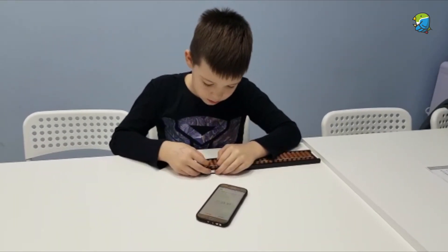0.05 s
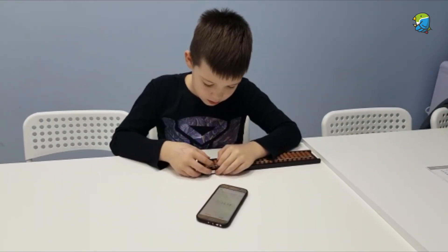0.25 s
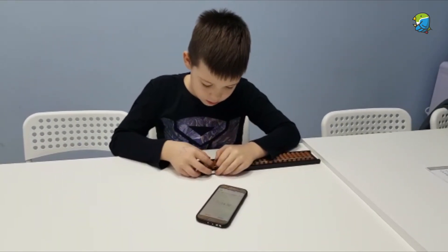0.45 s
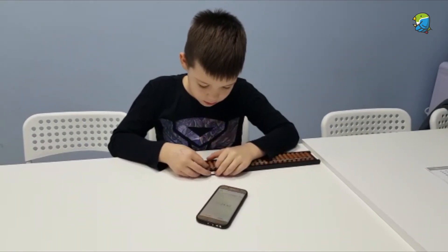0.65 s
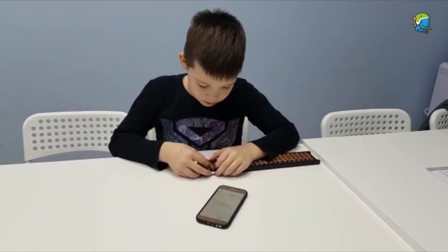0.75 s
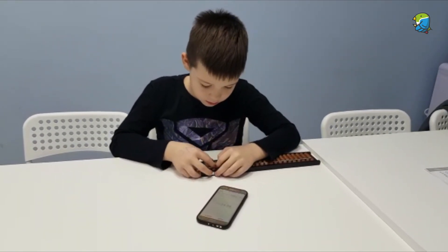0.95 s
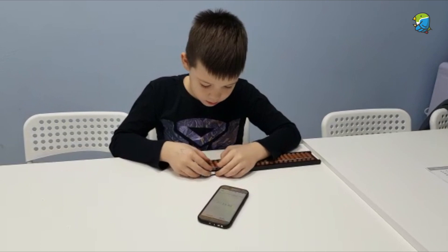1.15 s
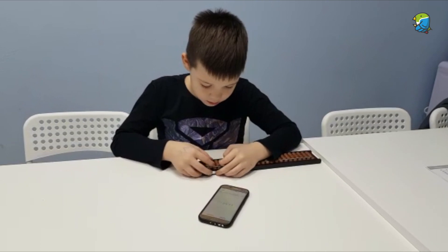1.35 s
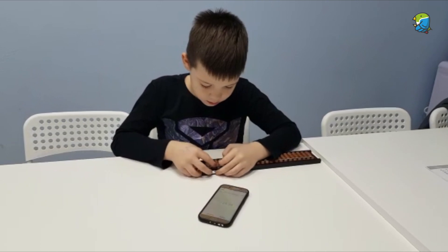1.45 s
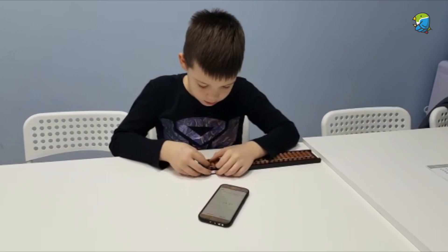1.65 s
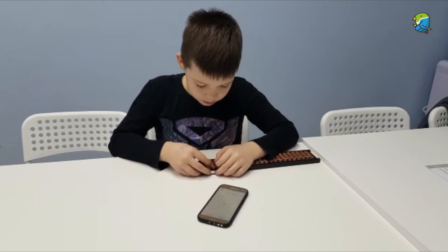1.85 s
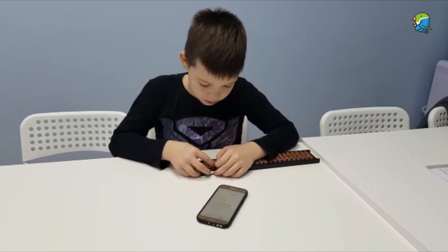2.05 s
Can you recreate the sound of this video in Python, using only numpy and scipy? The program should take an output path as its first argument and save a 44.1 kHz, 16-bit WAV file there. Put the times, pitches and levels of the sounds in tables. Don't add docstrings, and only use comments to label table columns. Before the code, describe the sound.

Small hard beads snap and tick against a frame, with faint slides between, over low ventilation rumble

```python
import sys
import numpy as np
from scipy import signal
from scipy.fft import rfft, irfft
from scipy.io import wavfile

SR = 44100
rng = np.random.default_rng(int(sys.argv[2]) if len(sys.argv) > 2 else 0)


def natural_amplitude(level_db):
    exponent = np.asarray(level_db, float) / 20
    return 10 ** exponent


def transcribe(u):
    v = np.clip(np.atleast_2d(u).T, -1, 1)
    q = np.round(v * 32767).astype(np.int16)
    wavfile.write(sys.argv[1], SR, q)


N = 92610
WAYS = 6
CONTACTS = 7


def across(points, hz):
    p = np.array(points, float)
    return np.interp(np.log(hz + 1), np.log(p[:, 0]), p[:, 1])


def level(x, db):
    return x * natural_amplitude(db) / np.sqrt(np.mean(x ** 2))


def tinted(points, rows):
    hz = np.arange(N // 2 + 1) * SR / N
    inside = (hz > points[0][0]) * (hz < points[-1][0])
    return rfft(rng.standard_normal((rows, N))) * natural_amplitude(across(points, hz)) * inside, hz


def hiss():
    # (frequency [Hz], density [dB per Hz])
    hiss_colour = [(280, -33), (480, -23), (547, 1), (624, -8), (672, -5), (861, -5.5), (8430, -12),
                   (15800, -7)]
    spectrum, _ = tinted(hiss_colour, 2)
    return level(irfft(spectrum, N), -64)


def ventilation():
    # (frequency [Hz], density [dB per Hz])
    rumble_colour = [(18, -7), (33, -8), (44, -17), (85, -9), (150, -14), (205, -11), (260, -20),
                     (480, -25)]
    # (frequency [Hz], left-right likeness [0-1])
    likeness = [(30, 0.31), (80, 0.96), (180, 0.49), (350, .5), (600, .1)]
    fan_hz, fan_width_hz, fan_db = 59.2, 14, 16
    swell_db, lean_db = 2.4, 0.4
    sides = np.array([[1], [-1]])
    noise, hz = tinted(rumble_colour, 2)
    mid, side = noise * (1 + natural_amplitude(fan_db) / (1 + (2 * (hz - fan_hz) / fan_width_hz) ** 2))
    alike = np.clip(across(likeness, hz), 0, 1)
    rumble = irfft(mid * np.sqrt(1 + alike) + side * np.sqrt(1 - alike) * sides, N)
    swell = np.interp(np.arange(N), np.linspace(0, N, num=12), rng.standard_normal(12))
    return level(rumble * natural_amplitude(swell_db * swell + lean_db / 2 * sides), -54)


def room(beads):
    # (band centre [Hz], t60 [s])
    bands = [(700, 0.34), (1400, 0.28), (2800, .32), (5600, 0.31), (11200, 0.25)]
    # (time [s], level [dB])
    echoes = [(.0125, -26), (.0205, -20)]
    gap_s, rise_s, hold_s, room_db = 0.0013, 0.0053, 0.026, 0
    t = np.arange(SR // 2) / SR
    hz = np.arange(len(t) // 2 + 1) * SR / len(t)
    noise = rfft(rng.standard_normal((WAYS, 2, len(t))))
    tail = 0
    for k, (_, t60_s) in enumerate(bands):
        share = across([(centre_hz, float(j == k)) for j, (centre_hz, _) in enumerate(bands)], hz)
        tail = tail + irfft(noise * share) * natural_amplitude(-60 * np.maximum(t - hold_s, 0) / t60_s)
    tail = tail * (1 - np.exp(-np.maximum(t - gap_s, 0) / rise_s))
    tail = tail * natural_amplitude(room_db) / np.sqrt(np.sum(tail ** 2) / 2)
    for k, (s, db) in enumerate(echoes):
        tail[k + 1, [0, 1], int(s * SR) + rng.integers(12, size=2)] += natural_amplitude(db)
    return signal.fftconvolve(beads[:, None], tail, axes=2).sum(axis=0)[:, :N]


def port(x, points):
    cepstrum = irfft(np.log(natural_amplitude(across(points, np.linspace(0, SR / 2, num=513)))))
    cepstrum[1:512] *= 2
    cepstrum[513:] = 0
    response = irfft(np.exp(rfft(cepstrum)))[:512]
    return signal.fftconvolve(x, response)[:N]


def microphones(beads, wet):
    # (frequency [Hz], gain [dB])
    near_left = [(500, -14.5), (2000, -2.5), (3800, -11), (5600, -4.5), (7200, -4.5), (8800, -5),
                 (12000, -3), (15500, -3)]
    # (frequency [Hz], gain [dB])
    near_right = [(500, -12), (2000, -3.5), (3700, -17), (5700, 6), (7000, -9), (8400, -40.5),
                  (12000, -0.5), (15500, -21.5)]
    # (frequency [Hz], gain [dB])
    round_left = [(500, -7.5), (2000, -3), (3800, -12.5), (5300, -10.5), (6300, -8), (8800, -5),
                  (12000, -8), (15500, -7)]
    # (frequency [Hz], gain [dB])
    round_right = [(500, -7.5), (2000, -5), (3800, -12.5), (5600, -6.5), (7000, -11), (8100, -16),
                   (10000, -7), (15500, -11)]
    # (frequency [Hz], gain [dB])
    aside = [(1000, -45), (4000, -13.5), (12000, 1.5)]
    left_leads_s = 5e-5
    late = np.roll(beads[0] + port(beads[1], aside), int(round(left_leads_s * SR)))
    left = port(beads[0], near_left) + port(wet[0], round_left)
    right = port(late, near_right) + port(wet[1], round_right)
    return np.array([left, right])


def ring(modes, db, onsets, sizes, t):
    rise_cycles, detune_share, mode_scatter_db = 0.21, 0.041 / 4, 4
    hz, mode_db, t60_s = np.array(modes).T[:, :, None, None]
    age = np.maximum(t - onsets[:, None], 0)
    rise = 1 - np.exp(-age * hz / rise_cycles)
    swing = np.sum(rise * np.exp(-np.log(1000) * age / t60_s) * sizes[:, None], axis=1)
    detune, scatter = rng.standard_normal((2, WAYS, len(modes), 1))
    cycles = hz[:, 0] * (1 + detune_share * detune * [[[4]]] * across_ways()) * t
    each = swing * np.sin(2 * np.pi * (cycles + rng.random(detune.shape)))
    each = each / np.sqrt(np.sum(each ** 2, axis=2, keepdims=True))
    y = np.sum(each * natural_amplitude(mode_db[:, 0] + mode_scatter_db * scatter), axis=1)
    return y * natural_amplitude(db) * np.sqrt(.004 * SR / np.sum(y ** 2, axis=1, keepdims=True))


def across_ways():
    return np.array([0.25] + [1] * (WAYS - 1))[:, None, None]


def abacus(rows, chatter_s, fade_db, count):
    # (frequency [Hz], level [dB], t60 [s])
    frame_modes = [(626, -5.5, 0.02), (815, -2, 0.031), (971.5, -3, 0.034), (1092, -4, 0.066),
                   (1230, -2.5, 0.009), (1554, -2.5, 0.039), (1950, -6.5, 0.035), (2277, -4, 0.0054)]
    # (frequency [Hz], level [dB], t60 [s])
    bead_modes = [(2865, 3.5, 0.0032), (3595, 0.5, 0.013), (3950, 5.5, 0.0023), (4600, -2, 0.018),
                  (5296, 1.5, 0.0027), (6250, -2.5, 0.017), (7170, 0.5, 0.002)]
    # (frequency [Hz], level [dB], t60 [s])
    tick_modes = [(8020, -3.5, 0.009), (9600, -4, 0.009), (10200, 0, 0.0013), (11400, -13, 0.0018),
                  (11520, 7.5, 0.0016), (13500, -0.5, 0.012), (12600, -3.5, 0.0077), (16000, -3.5, 0.0014)]
    knock_db, knock_cycles = 5.5, 19.7
    contact_scatter_db, low_cut_hz = 9.5, 493
    out, t = np.zeros((WAYS, N + SR)), np.arange(SR // 22) / SR
    for s, bead_db, frame_db, tick_db, knock_hz in rows:
        at = int(s * SR)
        slots = (np.arange(count) + rng.random(count)) / count
        onsets = s - at / SR + (slots - slots[0]) * chatter_s
        sizes = natural_amplitude(contact_scatter_db * rng.standard_normal(count) + fade_db * slots)
        frame, bead = frame_modes, bead_modes
        knock = [(knock_hz, knock_db, knock_cycles / knock_hz)]
        if knock_hz < bead_modes[0][0] * .9:
            frame = frame_modes + knock
        else:
            bead = bead_modes + knock
        for modes, db in ((bead, bead_db), (frame, frame_db), (tick_modes, tick_db)):
            out[:, at:at + len(t)] += ring(modes, db, onsets, sizes, t)
    return signal.sosfilt(signal.butter(4, low_cut_hz, "high", fs=SR, output="sos"), out[:, :N])


def slides():
    # (time [s], bead level [dB], frame level [dB], tick level [dB], knock pitch [Hz])
    slide_events = [
        (.405, -51, -47, -58, 1650),
        (.420, -46, -45, -68, 2085),
        (.642, -53, -37, -67, 2100),
        (1.728, -41.5, -35, -61, 1522),
        (2.027, -44, -37.5, -57, 750),
    ]
    return abacus(slide_events, chatter_s=0.019, fade_db=-9, count=24)


def touches():
    # (time [s], bead level [dB], frame level [dB], tick level [dB], knock pitch [Hz])
    touch_events = [(.140, -67, -52, -62, 950), (.267, -35.5, -38, -58, 4600), (.521, -56, -48, -60, 1510),
                    (.526, -48, -40, -59, 1690), (1.231, -55, -44, -58, 1030),
                    (.639, -39.5, -33.5, -62, 1996), (.751, -31.5, -28.5, -61, 1390),
                    (.988, -53, -43, -56, 2380), (1.257, -35.5, -43.5, -50, 2040),
                    (1.488, -62, -49.5, -64, 1620), (1.605, -63, -39, -62, 1500),
                    (1.742, -56, -45, -63, 1500), (1.888, -56, -37, -67, 970),
                    (1.909, -44.5, -44, -54, 980), (1.998, -59, -46, -62, 1410)]
    return abacus(touch_events, chatter_s=0.00396, fade_db=-22, count=CONTACTS)


def taps():
    # (time [s], bead level [dB], frame level [dB], tick level [dB], knock pitch [Hz])
    tap_events = [
        (.250, -28.5, -27.5, -37, 1083),
        (.4425, -22.5, -33.5, -34.5, 5560),
        (.493, -26.5, -33, -40.5, 1067),
        (1.063, -23.5, -29, -33.5, 1500),
        (1.5465, -23.5, -35, -40, 5430),
        (1.5765, -27.5, -34.5, -36, 1554),
        (1.799, -31, -34, -39.5, 4560),
    ]
    return abacus(tap_events, chatter_s=0.001758, fade_db=-5.5, count=CONTACTS)


def clicks():
    # (time [s], bead level [dB], frame level [dB], tick level [dB], knock pitch [Hz])
    click_events = [
        (.214, -31.5, -31, -30.5, 1010),
        (.6585, -19.5, -19.5, -21, 1950),
        (0.7558, -20.5, -19.5, -23, 1470),
        (1.0044, -19.5, -26.5, -24.5, 5540),
        (1.119, -21, -29, -43, 5200),
        (1.138, -23.5, -24.5, -28.5, 1080),
        (1.270, -13.5, -27, -24.5, 6250),
        (1.753, -25, -26, -28.5, 964),
        (1.830, -28, -30, -37.5, 1034),
        (2.023, -38.5, -39, -54, 4600),
    ]
    return abacus(click_events, chatter_s=0.00305, fade_db=-3.5, count=CONTACTS)


def scene():
    beads = clicks() + touches() + taps() + slides()
    return microphones(beads, room(beads)) + ventilation() + hiss()


def band_limit(x):
    return signal.sosfilt(signal.butter(12, 16810, fs=SR, output="sos"), x)


def record(dry):
    top_cut = signal.ellip(6, .3, 50, 15460, fs=SR, output="sos")
    mix = signal.sosfilt(top_cut, dry)
    return band_limit(mix)


dry = scene()
out = record(dry)
transcribe(out)
```